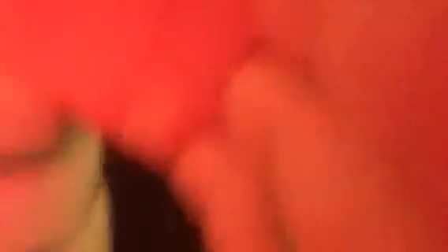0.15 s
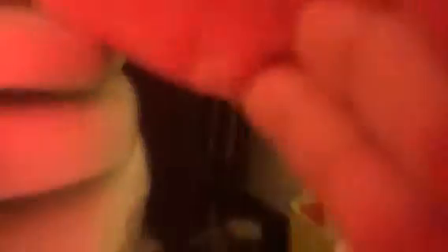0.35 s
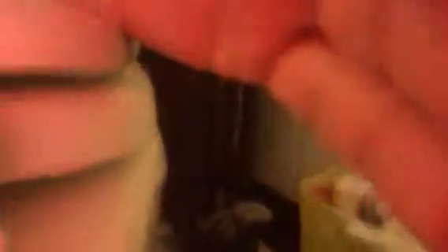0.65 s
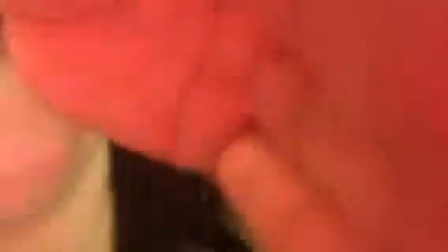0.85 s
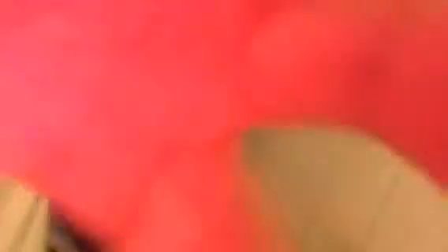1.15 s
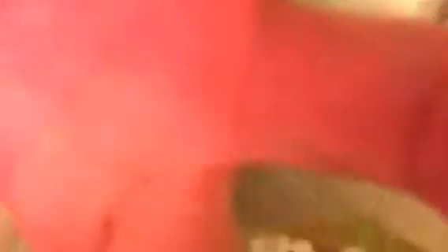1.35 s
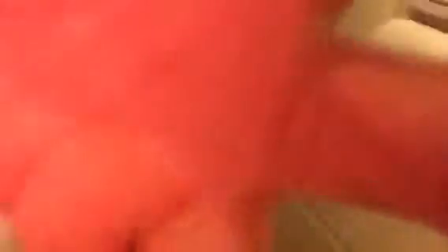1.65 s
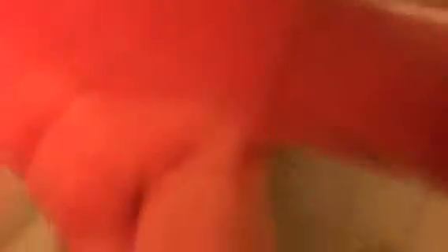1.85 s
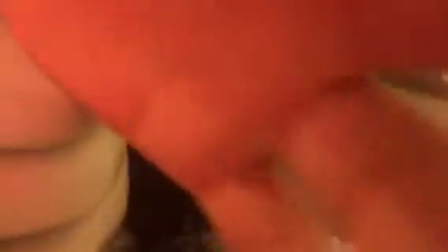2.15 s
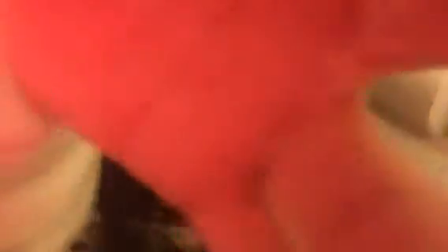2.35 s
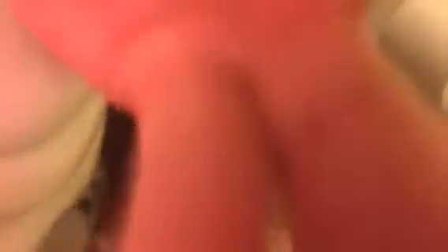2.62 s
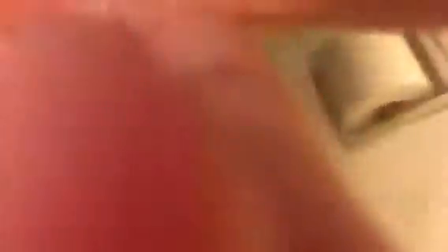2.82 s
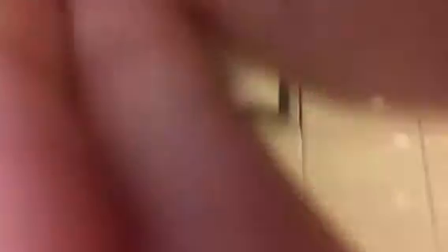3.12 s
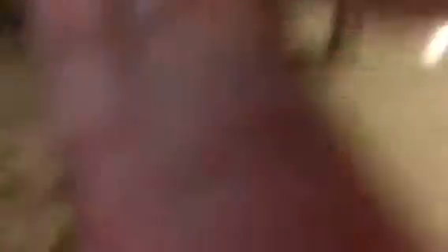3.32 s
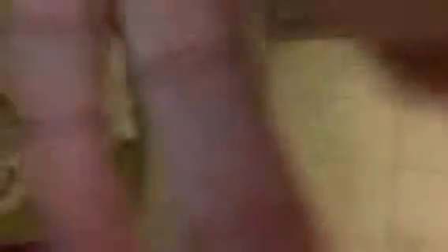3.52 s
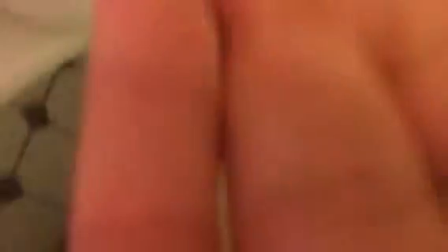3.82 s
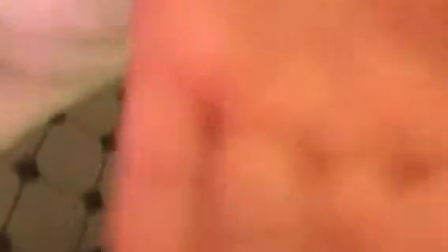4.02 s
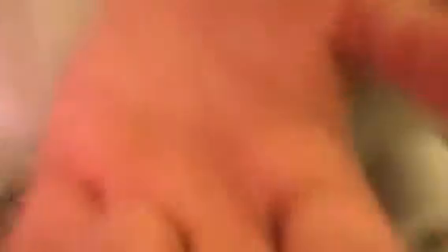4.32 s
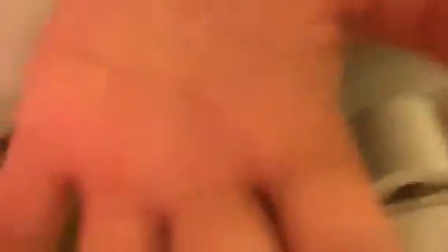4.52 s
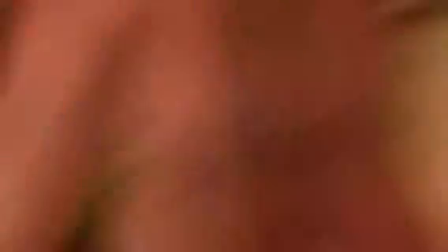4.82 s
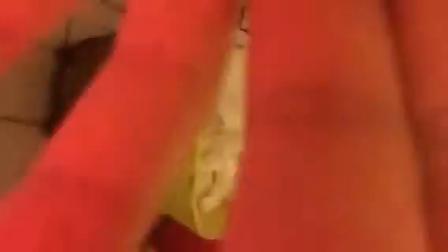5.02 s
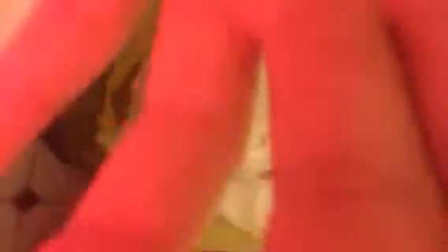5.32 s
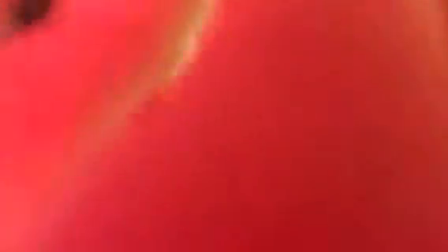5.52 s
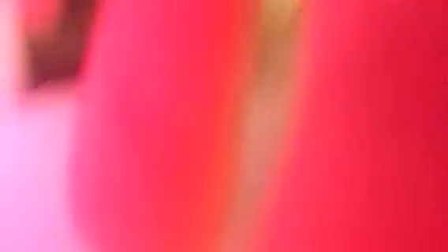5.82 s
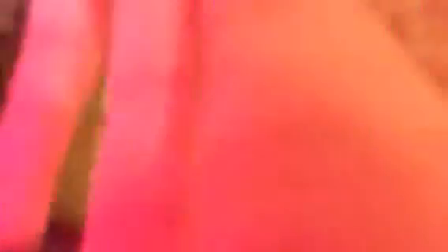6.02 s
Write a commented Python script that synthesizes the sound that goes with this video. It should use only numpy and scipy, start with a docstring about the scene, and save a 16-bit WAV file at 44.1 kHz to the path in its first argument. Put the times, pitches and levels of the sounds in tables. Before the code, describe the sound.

Close, dry handling noise in a quiet room. Skin slips over a hard plastic shell as brief rumbles, creaky groans and rasps, while fingertips bump it with dull, woody thuds and small gritty ticks. The hardest hits flatten and distort the tiny microphone. Dry skin hisses past it in short puffs. Activity is irregular, heaviest around three seconds, with a sharp knock near five and weaker fumbling afterwards.

```python
"""Close, dull bumps and creaky rubbing: fingers shift their grip on a small handheld camera, in a quiet room.
Skin drags over the plastic case in tiny slips, heard as rumble, creak, rasp and short pitched groans.
Fingertips bump the case with a gritty tick; each bump runs through it as a bending wave, highs first.
Dry skin hisses past the microphone port, over faint air noise and hum; the hardest bumps overload the input."""
import sys
import numpy as np
from scipy import signal
from scipy.fft import rfft, irfft, next_fast_len
from scipy.io import wavfile
from scipy.ndimage import uniform_filter1d, map_coordinates

SR = 44100
rng = np.random.default_rng(int(sys.argv[2]) if len(sys.argv) > 2 else 0)


def digitize_waveform(pressure):
    """Quantize a signal to 16-bit integers and store it at the path in sys.argv[1].

    Rows of a 2-D input are taken as channels; values are limited to [-1, 1].
    """
    field = np.atleast_2d(pressure).T
    bounded = np.clip(field, -1, 1)
    quanta = np.round(bounded * 32767).astype(np.int16)
    wavfile.write(sys.argv[1], SR, quanta)


N = 271656

# Fingers drag over the case; the levels are nominal, and where the finger presses decides the groan's pitch:
# (start [s], length [s], rumble at mid-stroke [dB], shell creak over rumble [dB],
#  swell from start to end [dB], groan pitch at mid-stroke [Hz])
STROKES = [ (0.0, 0.16, -60, -4, -16, 570), (0.211, 0.091, -22.5, -3, 10, 224.4),
           (0.325, 0.051, -43, -15.5, 5, 195.5), (0.429, 0.15, -39.5, -4, 9, 302),
           (0.6, 0.097, -41.5, -10, -0.5, 222), (0.785, 0.087, -31, -2.5, 20, 310),
           (0.893, 0.053, -28, -3.5, -6, 236.5), (0.968, 0.11, -32.5, 4, 4.5, 660),
           (1.114, 0.22, -36.5, -7.5, -0.5, 173), (1.378, 0.13, -33, -8, -13, 202.5),
           (1.55, 0.085, -40, -2.5, -5, 142), (1.659, 0.052, -31.5, -20.5, 5, 270),
           (1.754, 0.092, -29, -8, 5.5, 256), (1.906, 0.035, -40, -5.5, 19.5, 192),
           (2.009, 0.36, -70, 8, -20.5, 593), (2.093, 0.13, -29.5, -7, -17, 534.3),
           (2.38, 0.16, -40.5, 0.5, 11.5, 305), (2.579, 0.0022, -18.5, -4, 2.5, 553),
           (2.708, 0.013, -17.5, -7, 0, 266), (2.765, 0.068, -17.5, -9.5, -9, 205),
           (2.84, 0.14, -29, -3, -5, 178.6), (2.995, 0.038, -23, 0, 11, 1310),
           (3.098, 0.06, -29.5, -19, 2.5, 133), (3.261, 0.088, -35.5, -11, -1.5, 570),
           (3.44, 0.17, -50.5, 1.5, 1, 544), (3.732, 0.11, -36.5, 5.5, 13, 549),
           (3.822, 0.021, -34, 10, 0, 833), (4.003, 0.15, -39.5, -6, -2.5, 112),
           (4.198, 0.26, -37.5, -4, 19.5, 98.3), (4.408, 0.16, -28.5, -0.5, 8.5, 137),
           (4.592, 0.13, -36.5, 0, 4.5, 615), (4.767, 0.037, -22, 2.5, 9.5, 630),
           (4.859, 0.06, -43.5, 1.5, -1, 175), (4.921, 0.12, -49.5, 5, 17, 582),
           (5.071, 0.073, -43.5, 2, 8, 241), (5.157, 0.1, -50.5, -16, -2, 166),
           (5.327, 0.0059, -47.5, -8.5, 0, 954), (5.464, 0.099, -44, -6, 0.5, 195),
           (5.614, 0.25, -53.5, -5.5, -10.5, 90.3), (6.083, 0.047, -56, 7.5, 0, 543)]
CUTOFF_HZ = 16150   # top of the recorded treble


def from_db(db):
    """Decibels to gain."""
    return 10 ** (np.asarray(db) / 20)


def rms_one(x):
    """Scale to unit power."""
    return x / np.sqrt(np.mean(x ** 2) + 1e-20)


def evened(x, seconds):
    """Hold the running power at one, keeping the fine grain."""
    power = uniform_filter1d(x * x, max(int(seconds * SR), 1))
    return x / np.sqrt(np.abs(power) + 1e-12)


def band(x, low_hz, high_hz, order=2):
    """Causal band-pass."""
    sos = signal.butter(order, [low_hz, min(high_hz, .45 * SR)], "band", fs=SR, output="sos")
    return signal.sosfilt(sos, x + 1e-18)


def low_pass(x, top_hz, order=2):
    """Causal roll-off."""
    sos = signal.butter(order, min(top_hz, .45 * SR), fs=SR, output="sos")
    return signal.sosfilt(sos, x + 1e-18)


def noise(spectrum):
    """Noise of unit power, coloured by a curve of (frequency [Hz], relative density [dB])."""
    hz, db = np.transpose(spectrum)
    size = next_fast_len(N)
    grid = np.maximum(np.fft.rfftfreq(size, 1 / SR), 1)
    gain = from_db(np.interp(np.log(grid), np.log(hz), db))
    return rms_one(irfft(rfft(rng.standard_normal(size)) * gain, size)[:N])


def add(out, s, sound):
    """Mix a sound in at time s."""
    i = int(s * SR)
    out[i:i + len(sound)] += sound[:N - i]


def room(air_db=-59):
    """Faint air noise and the steady tones of a mains hum."""
    # colour of the air noise: (frequency [Hz], relative density [dB])
    air_colour = [(30, -8), (120, 0), (500, -16), (1700, -40), (16000, -52)]
    # steady tones ahead of the microphone: (frequency [Hz], rms level [dB])
    hum_tones = [(59.5, -62), (409, -66)]
    t = np.arange(N) / SR
    out = from_db(air_db) * noise(air_colour)
    for hz, db in hum_tones:
        out += from_db(db) * np.sqrt(2) * np.sin(2 * np.pi * hz * t)
    return out


def bending(x, lowest_hz=100, highest_hz=1500, count=5):
    """A chain of all-passes: the lower a bending wave, the later it arrives."""
    for hz in np.geomspace(lowest_hz, highest_hz, count):
        pole = np.exp(-2 * np.pi * hz / SR)
        x = signal.lfilter([-pole, 1], [1, -pole], x)
    return x


def case(x):
    """The hand-damped case rings briefly on top of whatever shakes it."""
    # resonances of the plastic case: (frequency [Hz], width [Hz], level [dB])
    case_modes = [(535.7, 55, 0.5), (643, 24, -12), (864, 3300, -15.5), (1894, 21, -5)]
    out = x.copy()
    for hz, width_hz, db in case_modes:
        r = np.exp(-np.pi * width_hz / SR)
        drive = np.array([1, 0, -1]) * (1 - r * r) / 2
        ringing = [1, -2 * r * np.cos(2 * np.pi * hz / SR), r * r]
        out += from_db(db) * signal.lfilter(drive, ringing, x + 1e-18)
    return out


def contact_modes(x, lowest_hz=170, highest_hz=4200, sharpness=9, wander_db=3.5, wander_hz=18, count=24):
    """As the contact point travels, it favours ever different modes of the case."""
    out, t = x.copy(), np.arange(N) / SR
    knots = np.arange(0, t[-1] + 1, 1 / wander_hz)
    for hz in np.geomspace(lowest_hz, highest_hz, count):
        favour = np.interp(t, knots, np.clip(rng.standard_normal(len(knots)), -2, 2))
        out += from_db(wander_db * favour) * band(x, hz, hz * (1 + 1 / sharpness), order=1)
    return out


def slips(per_s=1100, size_spread_db=4, smooth_db=-3, clump_db=1.5, clump_hz=60, even_s=0.12):
    """Skin ridges catch and let go in random clumps, over a smooth drag; the running power stays even."""
    sizes = from_db(size_spread_db * np.clip(rng.standard_normal(N), -2, 2))
    clicks = (rng.random(N) < per_s / SR) * sizes * rng.choice([-1, 1], N)
    force = rms_one(clicks) + from_db(smooth_db) * rng.standard_normal(N)
    grip = rms_one(low_pass(rng.standard_normal(N), clump_hz))
    return evened(force * from_db(clump_db * grip), even_s)


def pressure(t, start, length, swell_db):
    """Pressure in dB, rising or easing steadily through a stroke about its middle."""
    return swell_db * (np.clip((t - start) / length, 0, 1) - .5)


def stroke_shape(t, start, length, swell_db):
    """A stroke grips, swells or eases steadily, and lets go; the skin creeps on faintly afterwards."""
    grip_db_per_s, let_go_db_per_s = 700, 602.5
    linger_db, linger_db_per_s = -25, 165.5
    grip_db = -grip_db_per_s * np.maximum(start - t, 0)
    since = np.maximum(t - start - length, 0)
    release_db = np.maximum(-let_go_db_per_s * since, linger_db - linger_db_per_s * since)
    return from_db(pressure(t, start, length, swell_db) + grip_db + release_db)


def stroke_gains():
    """Rumble and creak gains of all strokes over time, their powers added."""
    t, rumble, creak = np.arange(0, N, 32) / SR, 0, 0
    for start, length, db, creak_db, swell_db, _ in STROKES:
        gain = from_db(db) * stroke_shape(t, start, length, swell_db)
        rumble = np.hypot(rumble, gain)
        creak = np.hypot(creak, gain * from_db(creak_db))
    return [np.interp(np.arange(N) / SR, t, gain) for gain in (rumble, creak)]


def skin_hiss(level_db=-3, flutter_db=2.5, flutter_hz=22, split_hz=7200):
    """Dry skin hisses; as the contact shifts, the lower and upper treble flutter on their own."""
    # colour of the hiss: (frequency [Hz], relative density [dB])
    hiss_colour = [(1200, 6), (2500, 2), (4200, 1), (4900, -3.5), (6200, -3.5), (7500, -12.5), (12500, -6),
                   (16000, -23.5)]
    hiss, skin = noise(hiss_colour), 0
    for low_hz, high_hz in ((1200, split_hz), (split_hz, CUTOFF_HZ)):
        contact = rms_one(low_pass(rng.standard_normal(N), flutter_hz))
        skin = skin + band(hiss, low_hz, high_hz, order=4) * from_db(level_db + flutter_db * contact)
    return skin


def brushing(stroke_hiss_db=-36, touch_db=-53.5, touch_hiss_db=-76):
    """Every stroke hisses a little; sweeps past the port are smooth arches, coloured by the finger's gap."""
    # dry skin sweeps past the microphone port: (middle [s], length [s], nominal level [dB],
    # resonance of the gap under the finger [Hz])
    sweep_list = [ (0.125, 0.071, -64, 3020), (0.281, 0.091, -50.5, 5600), (0.793, 0.052, -48.5, 5170),
                  (0.856, 0.052, -51.5, 4970), (0.957, 0.12, -58, 5670), (1.202, 0.12, -54, 8800),
                  (1.333, 0.076, -56.5, 5880), (1.468, 0.077, -54.5, 5600), (1.572, 0.058, -48, 11700),
                  (1.657, 0.031, -54.5, 9650), (1.859, 0.12, -61.5, 5970), (2.089, 0.14, -46, 6220),
                  (2.423, 0.26, -58, 5970), (2.726, 0.12, -46, 5830), (2.88, 0.095, -57, 4230),
                  (3.048, 0.095, -40.5, 5280), (3.283, 0.086, -59, 8750), (3.592, 0.04, -55, 9100),
                  (3.697, 0.068, -64, 3200), (3.806, 0.11, -58, 2600), (4.08, 0.024, -53.5, 8800),
                  (4.316, 0.27, -61, 5670), (4.44, 0.091, -47, 5550), (4.558, 0.078, -43, 4940),
                  (4.697, 0.092, -61, 5900), (4.834, 0.044, -39, 12000), (5.037, 0.2, -63, 5930),
                  (5.483, 0.037, -64.5, 6070), (5.629, 0.027, -41.5, 11100), (5.721, 0.012, -48, 4260),
                  (5.794, 0.085, -54.5, 11500), (6.108, 0.045, -53.5, 6000)]
    edge_db = 9   # fall at a sweep's two ends
    gap_db, gap_width = 1.5, 0.21   # strength and relative width of the gap resonance
    skin, t = skin_hiss(), np.arange(N) / SR
    creak = stroke_gains()[1]
    # well above touch_db of creak the skin is in full contact and its faint extra hiss is even
    touching = creak / (creak + from_db(touch_db))
    out = (from_db(stroke_hiss_db) * creak + from_db(touch_hiss_db) * touching) * skin
    for middle, length, db, hz in sweep_list:
        near = np.abs(t - middle) < 2 * length
        spread = 1 + gap_width / 2
        gap = band(skin[near], hz / spread, hz * spread, order=1)
        arch_db = db - edge_db * (2 * (t[near] - middle) / length) ** 2
        out[near] += from_db(arch_db) * (skin[near] + from_db(gap_db) * gap)
    return out


def groans(level_db=-4.5, width=0.18, glide_octaves_per_db=0.0657, even_s=0.032):
    """Each stroke's slips drive one case resonance hardest; firmer pressure stiffens and raises it."""
    shell_hz = 400    # groans above this belong to the creak, others to the rumble
    damped_hz = 1140  # the hand damps higher resonances more: above this a groan widens into a rasp
    out, t, force = np.zeros(N), np.arange(N) / SR, slips()
    for start, length, db, creak_db, swell_db, hz in STROKES:
        near = (t > start - .1) & (t < start + length + .1)
        spread = 1 + width * (1 + (hz / damped_hz) ** 4) / 2
        ring = evened(band(force[near], hz / spread, hz * spread), even_s)
        # reading the ring faster or slower bends its pitch
        speed = 2 ** (glide_octaves_per_db * pressure(t[near], start, length, swell_db))
        ring = map_coordinates(ring, [np.cumsum(speed)], mode="mirror")
        gain = from_db(db + level_db + creak_db * (hz > shell_hz))
        out[near] += gain * stroke_shape(t[near], start, length, swell_db) * ring
    return out


def catches(per_s=45, catch_db=4, release_s=0.015, skin_yield_hz=110):
    """Now and then the skin sticks and breaks free: a unit-power gain that leaps up and dies back."""
    breaks = (rng.random(N) < per_s / SR) * rng.random(N)
    leaps = signal.lfilter([1], [1, -np.exp(-1 / (release_s * SR))], breaks + 1e-18)
    # soft skin rounds off every catch
    return rms_one(1 + from_db(catch_db) * low_pass(np.tanh(leaps), skin_yield_hz))


def rubbing(rub_db=-0.5, rasp_db=-19.5, rasp_top_hz=4500, even_s=0.018):
    """The slips shake the whole body (rumble), flex its shell (creak) and scratch its surface (rasp)."""
    # the scratched surface rings in two broad resonances: (frequency [Hz], width [Hz], level [dB])
    rasp_modes = [(1940, 510, 5.5), (3320, 490, -1.5)]
    rumble, creak = stroke_gains()
    rasp = creak * from_db(rasp_db)
    shake = case(contact_modes(bending(slips())))
    body = band(band(shake, 38, 220), 46, 570)
    shell = low_pass(band(shake, 480, 1080), 540)
    scratch = low_pass(band(shake, 1300, 3300), 920, order=1)
    surface = scratch.copy()
    for hz, width_hz, db in rasp_modes:
        surface += from_db(db) * band(scratch, hz - width_hz / 2, hz + width_hz / 2, order=1)
    surface = low_pass(surface, rasp_top_hz, order=4)
    catching = creak * evened(shell, even_s) + rasp * evened(surface, even_s)
    return from_db(rub_db) * (rumble * evened(body, even_s) + catches() * catching)


def contacts():
    """Every bump, then the lower thud as the finger's flesh lands; lighter bumps soon lose the thud."""
    # fingertips bump the case: (time [s], peak ahead of the microphone [dB], centre [Hz],
    # width [octaves], nominal tick level [dB])
    bump_list = [ (0.057, -43.5, 1484, 1.4, -39.5), (0.295, 10, 420, 1.3, -17.5),
                 (0.3033, 4.5, 236.3, 0.53, -15.5), (0.856, -16.5, 360, 0.63, -53),
                 (1.055, -16.5, 725, 0.21, -43), (1.2320, 2, 481, 1.23, -36), (1.240, -12.5, 570, 1.5, -38),
                 (1.759, -14.5, 157, 0.81, -56), (1.865, 9.5, 496, 0.95, -25.5),
                 (1.8746, -1.5, 524, 0.95, -31), (1.936, -24.5, 460, 0.76, -53),
                 (2.088, -8.5, 440, 1.2, -73), (2.1394, 11, 415, 1.28, -12.5), (2.1487, -2, 342, 1.05, -33),
                 (2.5039, -15.5, 455, 1.02, -39), (2.548, -12.5, 206, 1.4, -25),
                 (2.5755, -10, 940, 0.79, -50), (2.586, -9, 780, 1.1, -57), (2.598, -12, 278, 0.83, -43),
                 (2.69, -25, 352, 3.7, -58), (2.708, -12.5, 750, 1.6, -64), (2.723, -16, 710, 0.92, -48),
                 (2.755, -8.5, 676, 0.99, -26), (3.051, 13, 477, 1.42, 5.5), (3.055, 2, 71.4, 0.98, -33),
                 (3.081, -18, 1500, 0.57, -21), (3.084, 2.5, 387, 1, -10), (3.088, -4, 126, 3.2, -13.5),
                 (3.1190, -2.5, 293, 1.3, -21), (3.1330, -3.5, 222, 1.35, -25),
                 (3.142, -7.5, 410, 1.67, -23), (3.152, -18, 480, 1.3, -40),
                 (3.3143, -20.5, 490, 0.69, -42), (3.3265, -17, 326, 1.27, -31.5),
                 (3.337, -23, 299, 1.5, -38), (3.4910, -9, 280, 1, -28.5), (3.505, -14, 282, 0.94, -45),
                 (3.524, -17.5, 93, 1.3, -46.5), (3.6814, -23, 207, 1.05, -75),
                 (3.7340, -21.5, 527, 0.69, -53), (3.805, -19.5, 540, 0.59, -50),
                 (3.8555, -14.5, 720, 1.4, -35), (3.864, -17.5, 159, 1.8, -60),
                 (3.893, -18.5, 102, 0.66, -73), (4.199, -26, 520, 1.2, -68),
                 (4.201, -22.5, 71.6, 1.04, -73), (4.294, -59, 700, 3.2, -28),
                 (4.5059, -15, 540, 0.73, -62), (4.7366, -7, 216, 1.56, -31),
                 (4.808, 14.5, 407, 1.08, -2.5), (4.827, -0.5, 225, 1.86, -16),
                 (4.84, -6.5, 102, 1.46, -14.5), (5.05, 3.5, 313, 0.85, -15.5),
                 (5.0724, -5, 382, 1.12, -44), (5.1136, -19, 235, 0.82, -49),
                 (5.2, -19.5, 192, 0.99, -68.5), (5.322, -46.5, 435, 3.1, -51),
                 (5.448, -34, 480, 1.03, -49), (5.497, -28, 342, 1.8, -57), (5.555, -39.5, 190, 1.8, -53.5),
                 (5.632, -4.5, 684, 0.54, -30), (5.639, -3, 118, 1.24, -25), (5.65, -10.5, 77, 1.6, -41),
                 (5.662, -20, 151, 0.74, -27.5), (5.7442, -3.5, 186, 0.66, -28.5),
                 (5.7912, -0.5, 189, 1.4, -14.5), (5.812, -9, 194.7, 1.15, -24.5),
                 (5.949, -45, 1475, 1.74, -48.5), (5.959, -37.5, 163.7, 2.4, -55.5),
                 (6.0706, -4.5, 130, 1.75, -10.5)]
    firm_db = 6   # below this the thud weakens twice as fast as the bump
    thud_delay_s, thud_db, thud_tick_db = 0.005, -8, -36.5   # thud relative to bump, tick relative to thud
    pitch_ratio, thud_octaves = 0.32, 1.77
    for s, db, hz, octaves, tick_db in bump_list:
        yield s, db, hz, octaves, tick_db
        landed_db = db + thud_db - max(firm_db - db, 0)
        yield s + thud_delay_s, landed_db, hz * pitch_ratio, thud_octaves, landed_db + thud_tick_db


def tick_touch(t, tick_s, lead_s=0.0053, landing_s=0.00067, chafe_s=0.0027, chafe_db=-19):
    """The skin grazes the case just before the pad lands, then chafes briefly as it flattens."""
    after = t - lead_s - landing_s
    graze = np.exp(-np.abs(after) / landing_s)
    fading = np.exp(-np.abs(after) / tick_s) + from_db(chafe_db) * np.exp(-np.abs(after) / chafe_s)
    return np.where(after < 0, graze, fading), lead_s


def bumps(tick_s=0.00083, judder_db=-32, judder_s=0.0077):
    """Soft pads give low thuds, firm contacts higher knocks; a gritty tick marks the touch."""
    # colour of the tick: (frequency [Hz], relative density [dB])
    tick_colour = [(900, 2.5), (2000, -3), (4000, -6.5), (7000, -10.5), (13000, -14), (16000, -7)]
    # a sharper touch reaches higher: top of a -30 dB tick, rise per octave of top, highest top
    base_top_hz, tick_db_per_octave, highest_top_hz = 5283, 13.5, 12300
    pad_reach = 5   # a soft pad excites little beyond this multiple of its band's upper edge
    tick_early_s = 0.00051   # the tick is sent ahead of the bending wave by this shift
    out, t = np.zeros(N), np.arange(SR // 8) / SR
    grit = evened(noise(tick_colour), tick_s)
    touch, lead_s = tick_touch(t, tick_s)
    for s, db, hz, octaves, tick_db in contacts():
        top_hz = np.clip(base_top_hz * 2 ** ((tick_db + 30) / tick_db_per_octave), 1000, highest_top_hz)
        # one push, followed by a judder while the finger settles
        judder = np.exp(-t / judder_s) * rng.standard_normal(len(t))
        push = signal.unit_impulse(len(t)) + from_db(judder_db) * judder
        spread = 2 ** (max(octaves, .2) / 2)
        wave = case(bending(band(push, hz / spread, hz * spread)))
        wave = low_pass(wave, min(top_hz, pad_reach * hz * spread))
        add(out, s, from_db(db) * wave / np.abs(wave).max())
        start = rng.integers(N - len(t))
        tick = low_pass(touch * grit[start:start + len(t)], top_hz, order=3)
        add(out, s - lead_s - tick_early_s, from_db(tick_db) * tick / 2)
    return out


def scene():
    """Everything reaches the one microphone directly."""
    return (room() + brushing() + groans() + rubbing() + bumps())[None]


def record(dry, ceiling=0.61, knee=5.5, mic_cut_hz=43, low_cut_hz=10):
    """The small microphone loses the deepest bass; its input flattens the hardest bumps; the top is cut."""
    heard = signal.sosfilt(signal.butter(3, mic_cut_hz, "high", fs=SR, output="sos"), dry)
    clipped = heard / (1 + np.abs(heard / ceiling) ** knee) ** (1 / knee)
    coupled = signal.sosfilt(signal.butter(1, low_cut_hz, "high", fs=SR, output="sos"), clipped)
    return signal.sosfilt(signal.ellip(10, .1, 80, CUTOFF_HZ, fs=SR, output="sos"), coupled)


dry = scene()
out = record(dry)
digitize_waveform(out)
```